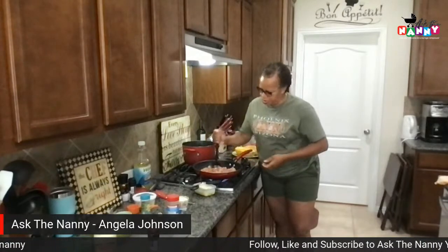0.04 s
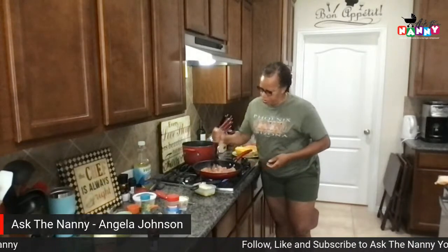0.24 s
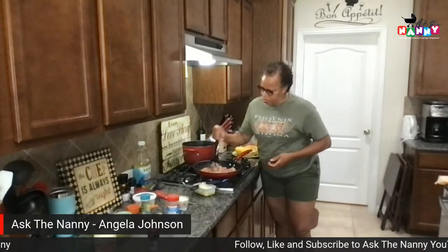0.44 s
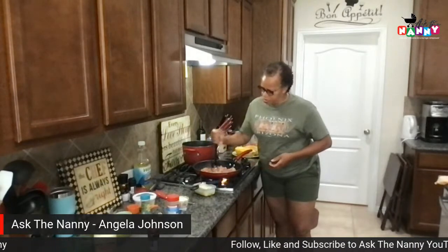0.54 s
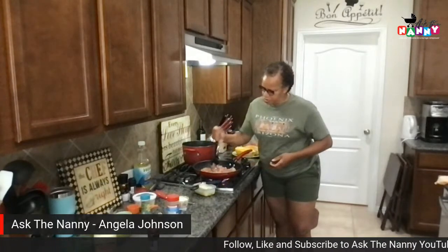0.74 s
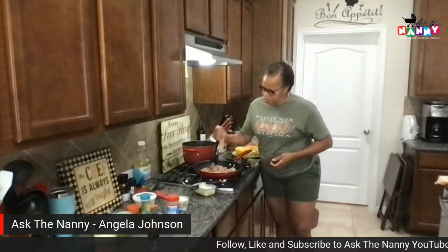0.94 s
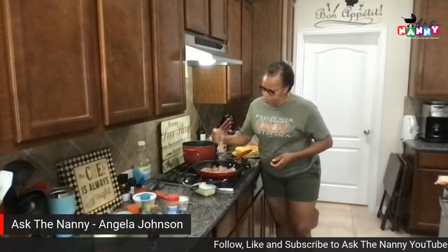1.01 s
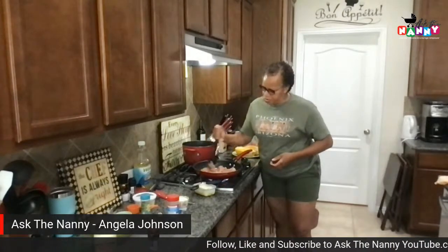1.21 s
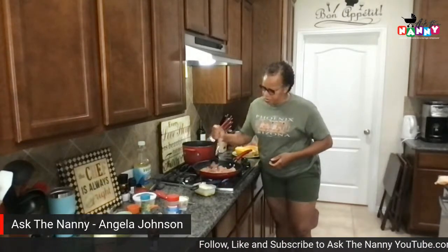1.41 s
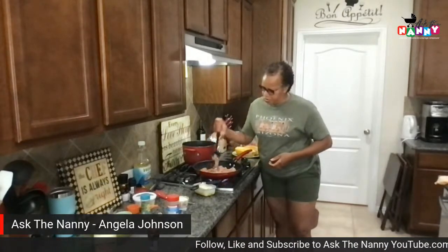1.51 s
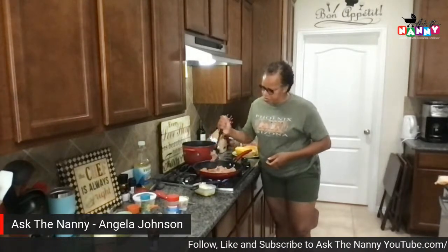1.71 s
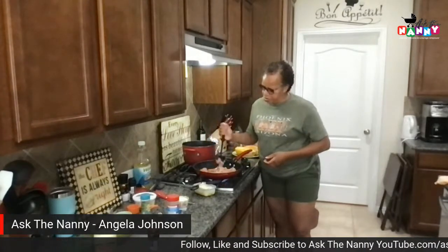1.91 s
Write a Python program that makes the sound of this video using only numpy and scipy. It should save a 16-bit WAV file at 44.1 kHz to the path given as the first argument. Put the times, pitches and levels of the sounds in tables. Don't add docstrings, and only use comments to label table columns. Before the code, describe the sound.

After a brief quiet hiss, loud fast metallic knocks of a masher in a skillet ring and boom off the stove, then the clatter fades; reverberant home kitchen, distant microphone, faint sizzle and hood hum.

```python
import sys
import numpy as np
from scipy import signal
from scipy.fft import rfft, irfft, next_fast_len
from scipy.io import wavfile
from scipy.ndimage import uniform_filter1d, minimum_filter1d

SR = 44100
rng = np.random.default_rng(int(sys.argv[2]) if len(sys.argv) > 2 else 0)


def magnitude_from_level(level_db):
    exponent = np.asarray(level_db, float) / 20
    return 10 ** exponent


def generate_wav(sig):
    pcm = np.round(np.clip(np.atleast_2d(sig).T, -1, 1) * 32767).astype(np.int16)
    wavfile.write(sys.argv[1], SR, pcm)


N = 85995

# start in seconds, peak in dB, brightness in dB per octave, boom in dB over the blow.
STRIKES = [
    (0.201, -1.5, -1, 0),
    (0.371, -2, 1.46, 0.7),
    (0.528, -3, 1, -3.5),
    (0.679, 0, -0.56, 1.4),
    (0.831, -1, -0.76, -2.5),
    (0.995, -2.5, -0.35, 1.5),
    (1.14, -2, -0.1, 0.4),
    (1.293, -1.5, -0.03, 1.8),
    (1.448, -1, -0.14, 1.5),
]
# buzz in dB, its length in seconds, rock-back delay in seconds,
# rock-back in dB.
CHATTER = [
    (-21.5, 0.036, 0.093, -47),
    (-28.5, 0.083, 0.063, -26),
    (-14.5, 0.024, 0.052, -24),
    (-26, 0.046, 0.054, -23.5),
    (-27, 0.035, 0.053, -23),
    (-34, 0.051, 0.0616, -26),
    (-30, .035, 0.058, -22),
    (-20, 0.02, 0.0583, -18),
    (-27, 0.043, 0.063, -25.5),
]
# one in Hz, its dB, the other in Hz, its dB.
LANDING = [(920, 7, 3940, 3), (702, 15, 1980, 8.5), (770, 8, 1620, 10.5), (576, -1, 3500, 8.5),
           (820, 9.5, 1200, -4), (580, 13.5, 1300, 4), (1100, 4.5, 1650, 5), (1140, 3.5, 570, 8),
           (674, 6, 1280, 4.5)]
# frequency in Hz, level in dB per Hz.
BLOW_COLOUR = [(200, -32.5), (400, -10), (600, -4.5), (1700, -7), (2400, -12.5), (5800, -18.5), (7100, -24),
               (7800, -26.5), (15800, -32)]
# frequency in Hz, delay in seconds.
SPEAKING_DELAY = [(300, 0.009827), (700, 0.00086), (2000, 0.00047), (5000, 0.00147), (9000, 0.0054)]
# frequency in Hz, width in Hz, level in dB over the blow colour.
PAN_MODES = [(583, 34, 7), (654, 103, 3), (724, 105, 3.5), (867, 20, 2), (940, 14, 0), (1117, 66, 5.5),
             (1220, 105, -13.5), (1292, 105, 1), (1582, 26, 8), (1719, 21, 8), (1926, 90, -11),
             (2175, 89, -15), (2870, 170, 4), (3270, 47, 7)]
# frequency in Hz, width in Hz, level in dB over the contact colour.
RIM_MODES = [(3970, 40, 4), (4410, 90, 4), (5100, 120, 2.5), (5610, 140, 5), (6790, 190, 4),
             (8130, 120, 1.5), (8650, 120, 4), (9080, 40, 3), (10100, 200, 2.5), (10500, 50, 4),
             (11100, 40, 4), (11900, 120, 3), (13200, 150, 1.5), (14500, 60, 2.5)]
# frequency in Hz, level in dB.
TICK_COLOUR = [(300, 12), (1500, -6), (4000, -5.2), (7000, -17.5), (9000, -8), (15500, -25)]
# frequency in Hz, level in dB.
KNOCK_COLOUR = [(100, -12.5), (250, 2.5), (600, -2.8), (1500, -9.5), (4000, -16.5), (15500, -37)]
# frequency in Hz, width in Hz, level in dB.
STOVE_MODES = [(60.4, 7.6, -9), (102, 8.7, -0.5), (147, 31, -14), (188.4, 25, -10.5), (270.5, 16.8, -1.5),
               (310.5, 19, -2.5), (386, 24.2, 0.4), (444, 29.3, 1)]
# frequency in Hz, 60 dB decay time in seconds.
ROOM_T60 = [(100, 0.73), (400, 0.52), (1500, .7), (4000, 0.56), (6800, 0.62), (7800, 0.43), (11000, 0.45),
            (15500, .45)]
# frequency in Hz, level in dB over the late tail.
EARLY_COLOUR = [(300, -16), (1000, -2.5), (3000, 2.5), (5500, -7.5), (9000, -11)]
# frequency in Hz, level in dB.
SETTLE_COLOUR = [(200, -36), (330, 1), (450, 1), (1000, -7.5), (1400, -13), (3000, -51)]
# frequency in Hz, level in dB per Hz.
HISS_COLOUR = [(30, -2), (120, -3), (600, -11), (2500, -14), (3700, -12.5), (6300, -14), (7800, -16.5),
               (10000, -10.5), (15800, -18.5)]
# frequency in Hz, level in dB.
WHINES = [(3618, -61), (5362, -76), (5502, -64.5), (6315, -92)]

EARLIER_S = 0.0005
DIRECT_DB, ROOM_DB, TICK_ROOM_DB = -13.5, 2.35, -2.5
BLOW_DB, PAN_DB, RIM_DB = 22, -1.5, 1.5
SCATTER_DB = 1.72
LANDING_Q = 10.2
CONTACT_S, CONTACT_RISE_S = 0.0069, 0.0012
SQUELCH_S, SQUELCH_DB = 0.0067, -25
TICKS_PER_S, TICK_SPREAD_DB, CHATTER_LAG_S = 1500, 3, 0.0032
ROCK_S = 0.016
KNOCKS_PER_S, KNOCK_DB, KNOCK_S = 220, 9.5, 0.021
THUD_HZ, THUD_S, THUD_DB = 150.8, 0.0081, 8.5
BOOM_RISE_S, BOOM_T60_S, BOOM_DB = 0.028, 0.27, -11
ROOM_RISE_S, EARLY_T60_S = 0.0022, 0.068
SETTLE_S, SETTLE_LEN_S, SETTLE_DB = 1.745, 0.028, -33.5
FLOOR_DB = -53.5
WHINE_FADE_S = 0.13
HISS_SHIFT_DB, HISS_SHIFT_HZ = 1.5, 1500
DIM_S, DIM_DB_PER_S, DIM_HZ = 1.657, -29, 2500
DUCK_S, DUCK_LEN_S, DUCK_DB, DUCK_DB_PER_S = 1.76, 0.006, -2, -30
LOW_CUT_HZ, TOP_HZ = 40, 15780
LIMIT_DB, LIMIT_HOLD_S = -0.5, 0.0028
CEILING, HARDNESS = 0.93, 6


def masher():
    out = np.zeros(N + SR)
    t = np.arange(SR) / SR
    for (start, db, bright_db, boom_db), row, spot in zip(STRIKES, CHATTER, LANDING):
        hit = blow(t, db, bright_db, spot)
        buzz = chatter(t, *row)
        low = boom(t, db + boom_db)
        room = kitchen(magnitude_from_level(ROOM_DB) * (hit + low) + magnitude_from_level(TICK_ROOM_DB) * buzz)
        i = round((start - EARLIER_S) * SR)
        out[i:i + SR] += magnitude_from_level(DIRECT_DB) * hit + buzz + low + room
        out[i - 4000:i] += squelch(t, db)
    return out[:N]


def blow(t, db, bright_db, spot):
    favoured = [(hz, hz / LANDING_Q, lift_db) for hz, lift_db in (spot[:2], spot[2:])]
    scrape = rng.standard_normal(len(t)) * magnitude_from_level(-60 * t / CONTACT_S) * (1 - np.exp(-t / CONTACT_RISE_S))
    push = (t == 0) + 0.36 * scrape

    def ring(f):
        late = np.exp(-2j * np.pi * np.cumsum(along(SPEAKING_DELAY, f)) * f[1])
        colour = along(BLOW_COLOUR, f) + bright_db * np.log2((f + 50) / 1000)
        body = humps(PAN_MODES + favoured, f, PAN_DB) + humps(RIM_MODES, f, RIM_DB)
        return late * causal(colour + body)

    x = filtered(push, ring)
    return magnitude_from_level(db + BLOW_DB) * x / np.linalg.norm(x)


def squelch(t, db):
    noise = unit(filtered(rng.standard_normal(len(t)), lambda f: magnitude_from_level(along(BLOW_COLOUR, f))))[:4000]
    return magnitude_from_level(db + SQUELCH_DB) * noise * np.exp(-t[4000:0:-1] / SQUELCH_S)


def chatter(t, db, length, rock_s, rock_db):
    fine = ticks(t, TICKS_PER_S, lambda f: along(TICK_COLOUR, f) + humps(RIM_MODES, f, RIM_DB))
    knocks = ticks(t, KNOCKS_PER_S, lambda f: along(KNOCK_COLOUR, f))
    fade_in = np.clip((t - CHATTER_LAG_S) / 0.016, 0, 1)
    fade_out = np.clip((length - t) / 0.012 + 1, 0, 1)

    def rock(width_s):
        return magnitude_from_level(rock_db) * np.exp(-((t - rock_s) / width_s) ** 2)

    thud = rock(THUD_S) * np.sin(2 * np.pi * (THUD_HZ * t + rng.random()))
    buzz = fine * (magnitude_from_level(db) * fade_in * fade_out + rock(ROCK_S))
    return buzz + magnitude_from_level(KNOCK_DB) * knocks * rock(KNOCK_S) + magnitude_from_level(THUD_DB) * thud


def ticks(t, per_s, colour_db):
    chance, sign, size = rng.random((3, len(t)))
    strength = magnitude_from_level(-TICK_SPREAD_DB * np.log(size + 0.016))
    train = (chance < per_s / SR) * np.sign(sign - 0.5) * strength
    return unit(filtered(train, lambda f: causal(colour_db(f))))


def boom(t, db):
    drone = unit(filtered(rng.standard_normal(len(t)), lambda f: modes(STOVE_MODES, f, SCATTER_DB)))
    rise = np.sin(np.pi / 2 * np.clip(t / BOOM_RISE_S, 0, 1)) ** 2
    return magnitude_from_level(db + BOOM_DB - 60 * t / BOOM_T60_S) * rise * drone


def kitchen(x):
    hz, t, z = signal.stft(rng.standard_normal(SR), SR, nperseg=256)
    late = magnitude_from_level(-60 * t / along(ROOM_T60, hz)[:, None])
    early = magnitude_from_level(along(EARLY_COLOUR, hz)[:, None] - 60 * t / EARLY_T60_S)
    tail = signal.istft(z * (late + early), SR, nperseg=256)[1][:SR]
    tail = tail * (1 - np.exp(-np.arange(SR) / SR / ROOM_RISE_S))
    return signal.fftconvolve(x, tail / np.linalg.norm(tail))[:len(x)]


def settle():
    t = np.arange(N) / SR
    shape = np.exp(-((t - SETTLE_S) / SETTLE_LEN_S) ** 2)
    return magnitude_from_level(SETTLE_DB) * shape * ticks(t, 480, lambda f: along(SETTLE_COLOUR, f))


def floor():
    t = np.arange(N) / SR
    hiss = unit(filtered(rng.standard_normal(N), lambda f: magnitude_from_level(along(HISS_COLOUR, f))))
    drift = np.cumsum(rng.standard_normal((len(WHINES), N)), axis=1) * 0.062
    fade = np.exp(-(t / WHINE_FADE_S) ** 2)
    out = magnitude_from_level(FLOOR_DB) * hiss
    for (hz, db), phase in zip(WHINES, drift):
        out = out + magnitude_from_level(db + 2.5) * fade * np.sin(2 * np.pi * hz * t + phase)
    return out


def modes(peaks, f, scatter_db):
    total = 0
    for k, (centre, width, db) in enumerate(peaks):
        strength = (-1) ** k * magnitude_from_level(db + scatter_db * rng.standard_normal())
        total = total + strength * 1j * f * width / (centre ** 2 - f * f + 1j * f * width)
    return total


def humps(peaks, f, gain_db):
    power = 0
    for centre, width, db in peaks:
        strength = magnitude_from_level(db + gain_db + SCATTER_DB * rng.standard_normal()) ** 2
        power = power + strength / (1 + (2 * (f - centre) / width) ** 2)
    return 10 * np.log10(1 + power)


def unit(x):
    return x / np.sqrt(np.mean(x ** 2) + 1e-20)


def along(points, hz):
    f, v = np.transpose(points)
    return np.interp(np.log(hz + 1), np.log(f + 1), v)


def filtered(x, response):
    m = next_fast_len(len(x) + 8192)
    return irfft(rfft(x, m) * response(np.fft.rfftfreq(m, 1 / SR)), m)[:len(x)]


def causal(db):
    c = irfft(np.maximum(db, -120) * np.log(10) / 20)
    c[1:len(c) // 2] *= 2
    c[len(c) // 2 + 1:] = 0
    return np.exp(rfft(c, 2 * len(db) - 2))


def above(x, hz):
    return filtered(x, lambda f: 1 / (1 + (hz / (f + 1)) ** 4))


def scene():
    t = np.arange(N) / SR
    bed = floor()
    struck = t > STRIKES[0][0]
    bed = bed - above(bed, HISS_SHIFT_HZ) * (1 - magnitude_from_level(HISS_SHIFT_DB)) * struck
    pan = masher()
    dim = magnitude_from_level(DIM_DB_PER_S * np.maximum(t - DIM_S, 0))
    pan = pan - above(pan, DIM_HZ) * (1 - dim)
    step = np.clip((t - DUCK_S) / DUCK_LEN_S, 0, 1)
    duck = magnitude_from_level(DUCK_DB * step + DUCK_DB_PER_S * np.maximum(t - DUCK_S, 0))
    return ((pan + settle()) * duck + bed)[None]


def top_cut(x):
    return signal.sosfilt(signal.butter(12, 16150, fs=SR, output="sos"), x)


def record(dry):
    x = filtered(dry[0], lambda f: (1j * f / (LOW_CUT_HZ + 1j * f)) ** 3)
    hold = int(LIMIT_HOLD_S * SR) + 8
    need = np.minimum(1, magnitude_from_level(LIMIT_DB) / (np.abs(x) + 1e-9))
    x = x * uniform_filter1d(minimum_filter1d(need, hold), hold)
    x = x / (1 + np.abs(x / CEILING) ** HARDNESS) ** (1 / HARDNESS)
    x = filtered(x, lambda f: f < TOP_HZ)[None]
    return top_cut(x)


dry = scene()
out = record(dry)
generate_wav(out)
```